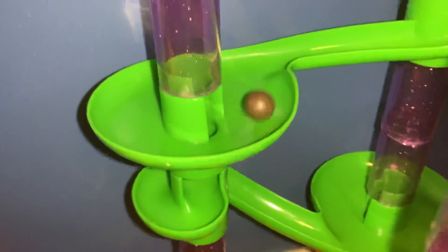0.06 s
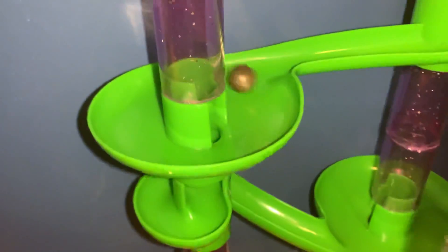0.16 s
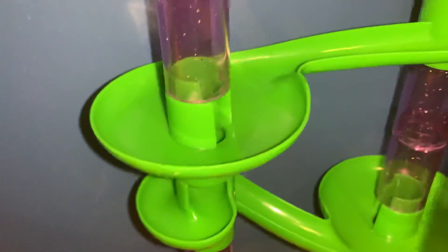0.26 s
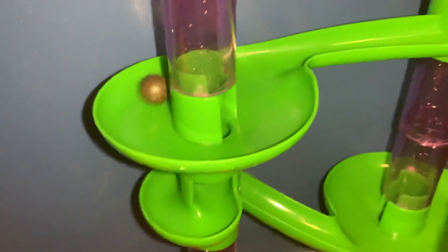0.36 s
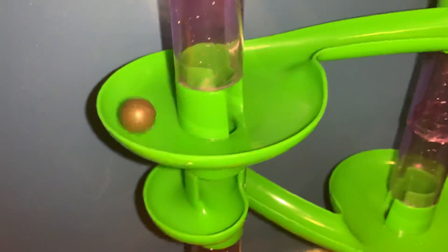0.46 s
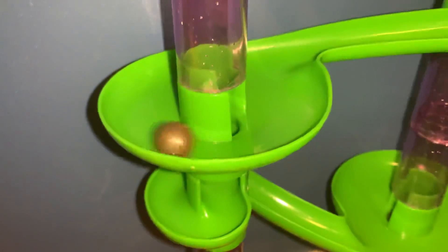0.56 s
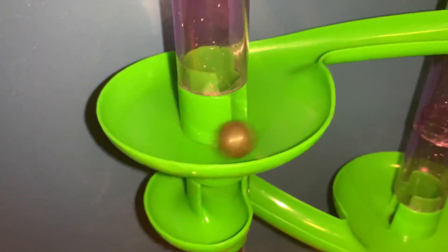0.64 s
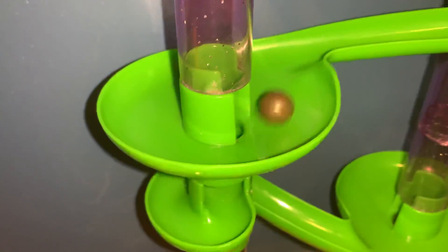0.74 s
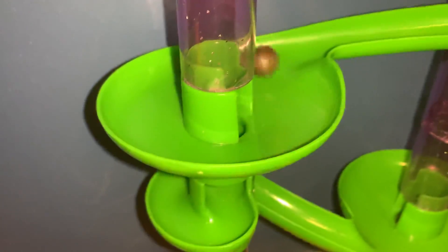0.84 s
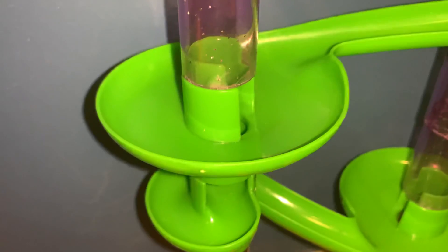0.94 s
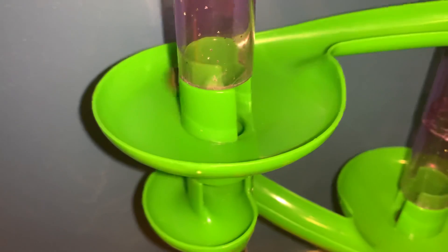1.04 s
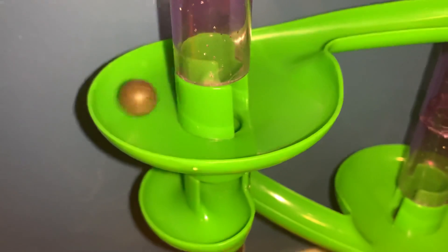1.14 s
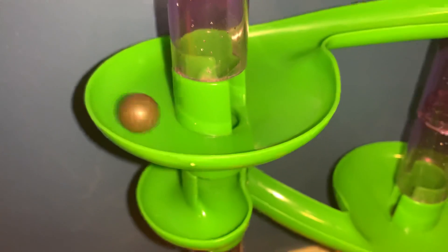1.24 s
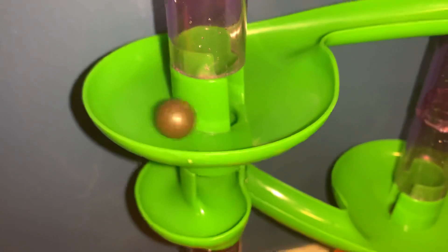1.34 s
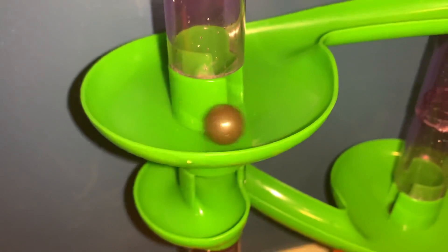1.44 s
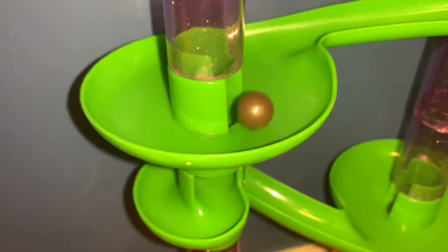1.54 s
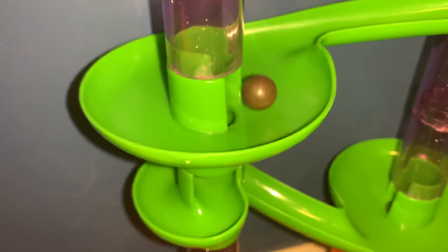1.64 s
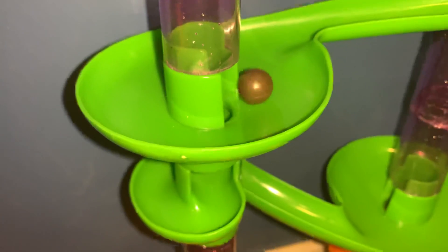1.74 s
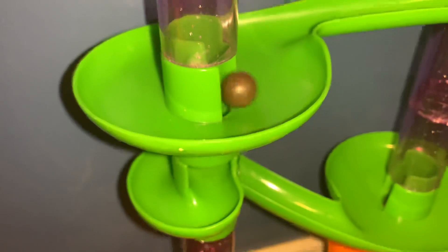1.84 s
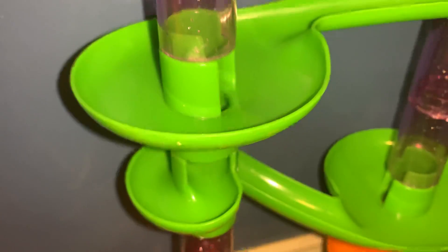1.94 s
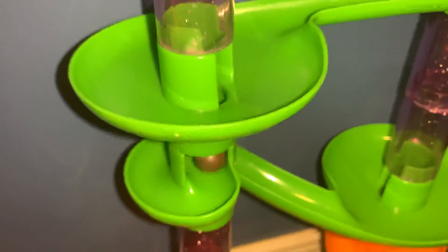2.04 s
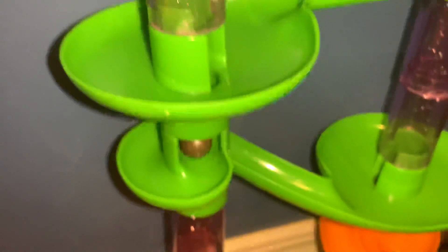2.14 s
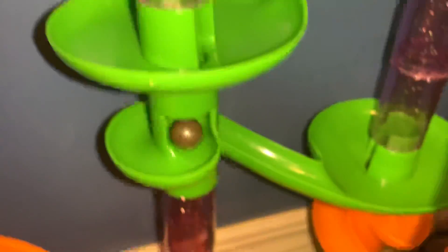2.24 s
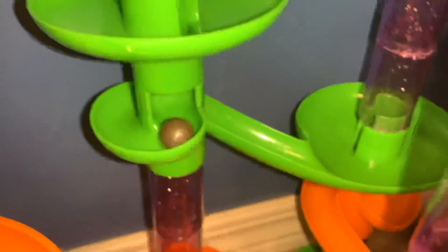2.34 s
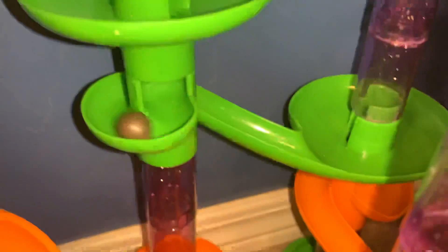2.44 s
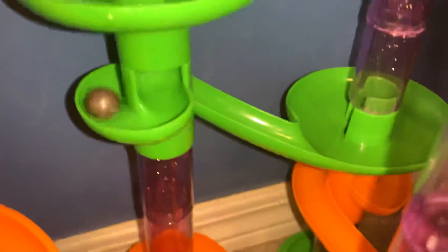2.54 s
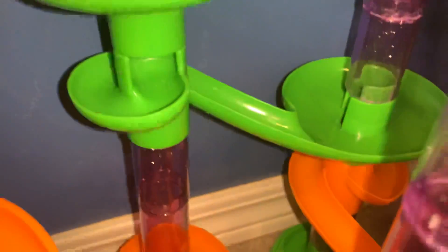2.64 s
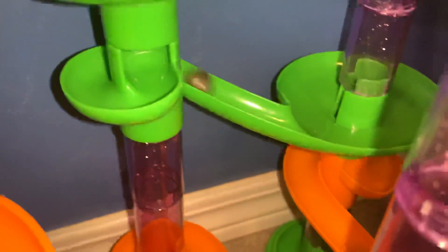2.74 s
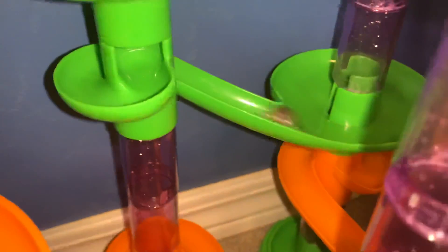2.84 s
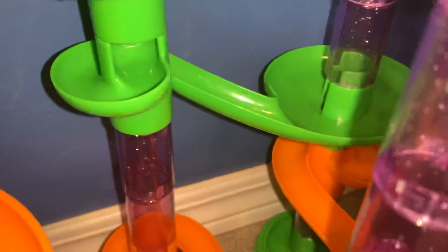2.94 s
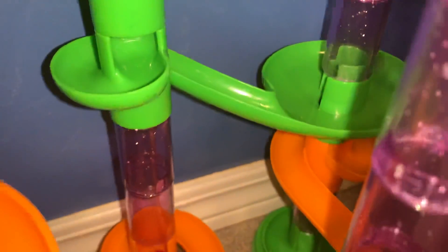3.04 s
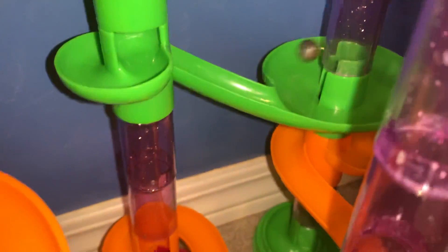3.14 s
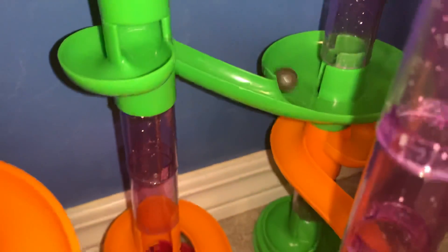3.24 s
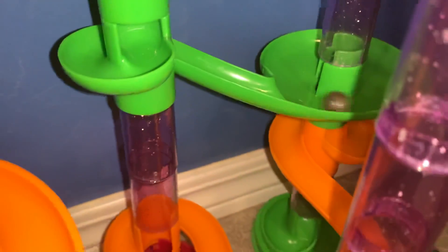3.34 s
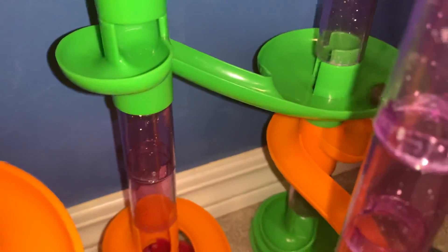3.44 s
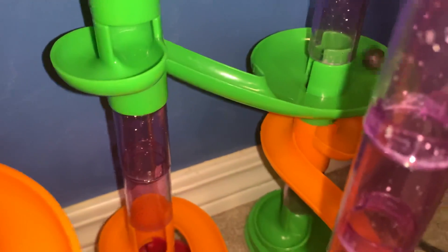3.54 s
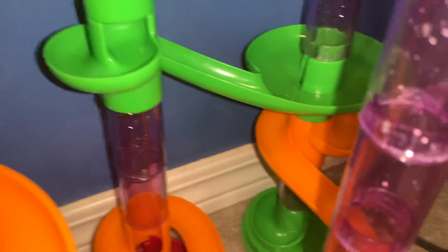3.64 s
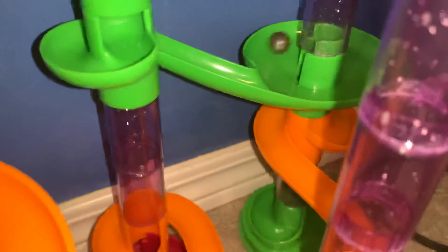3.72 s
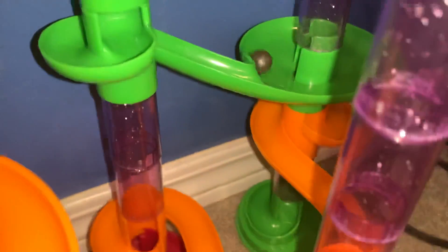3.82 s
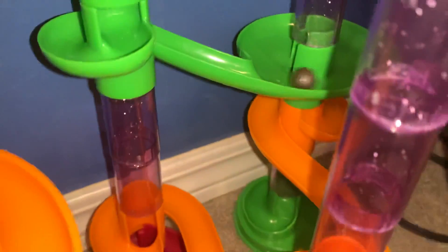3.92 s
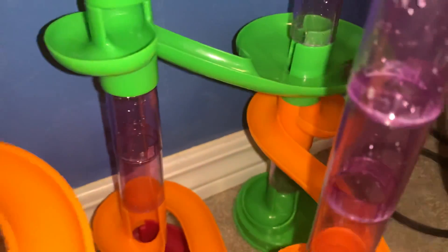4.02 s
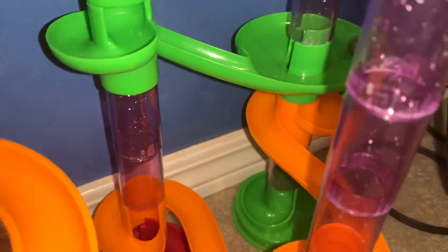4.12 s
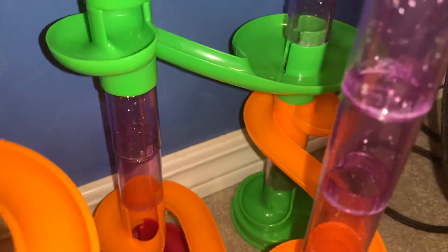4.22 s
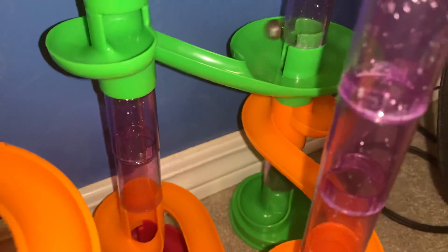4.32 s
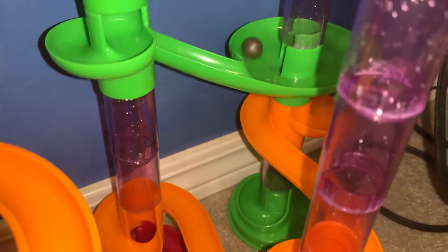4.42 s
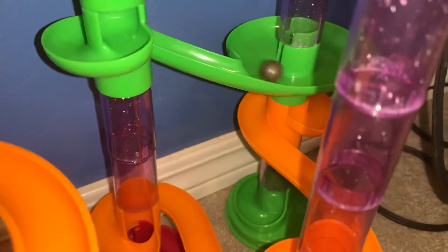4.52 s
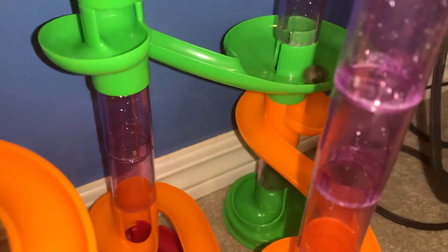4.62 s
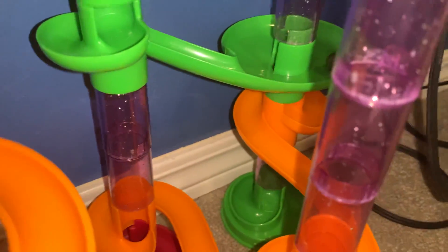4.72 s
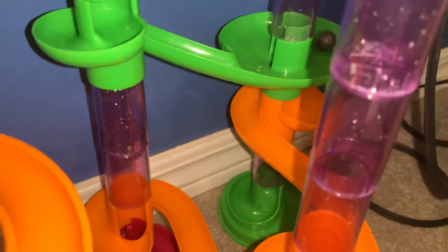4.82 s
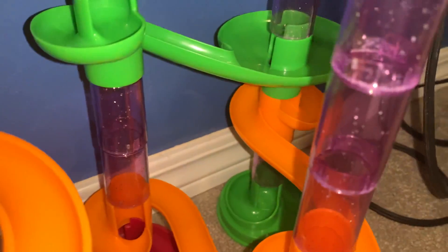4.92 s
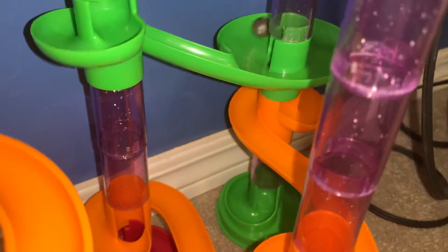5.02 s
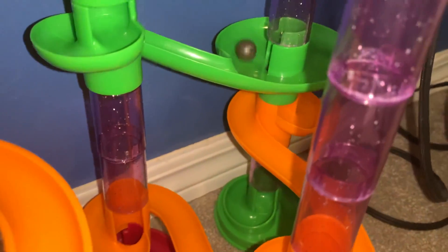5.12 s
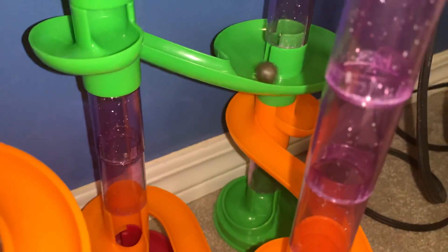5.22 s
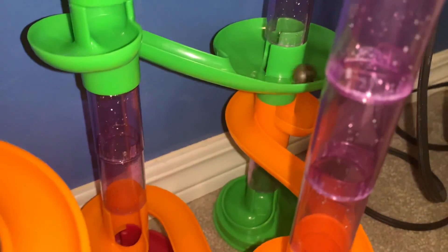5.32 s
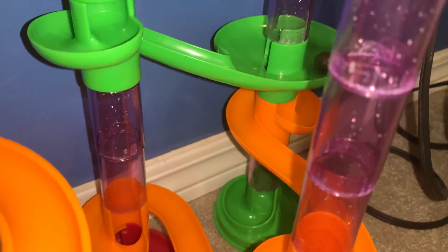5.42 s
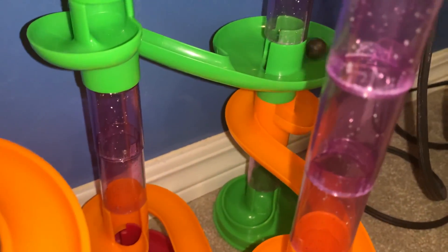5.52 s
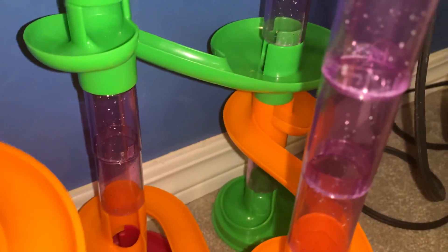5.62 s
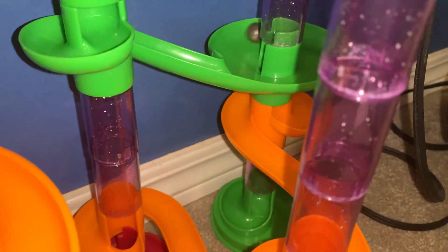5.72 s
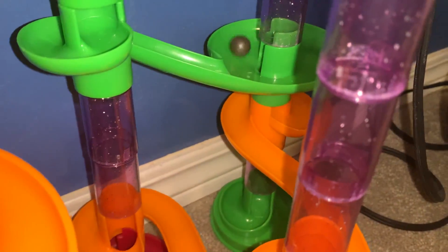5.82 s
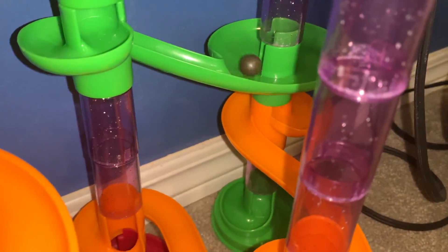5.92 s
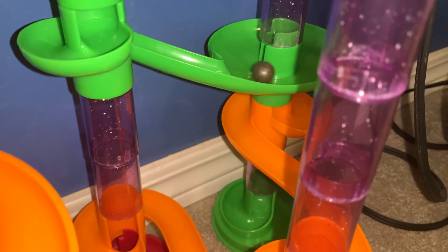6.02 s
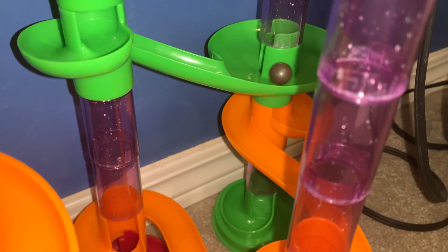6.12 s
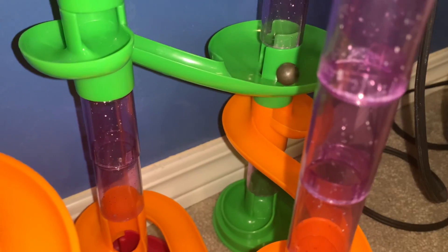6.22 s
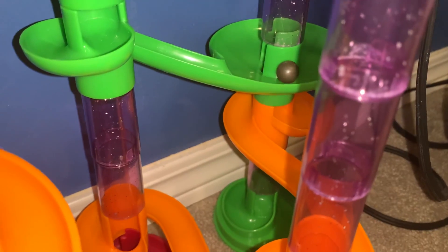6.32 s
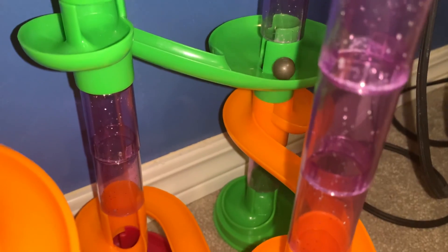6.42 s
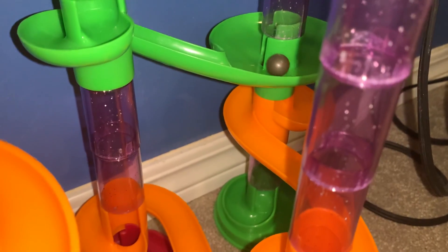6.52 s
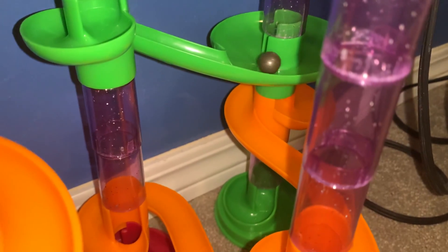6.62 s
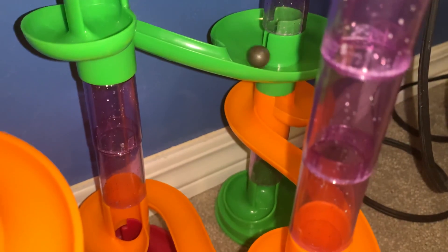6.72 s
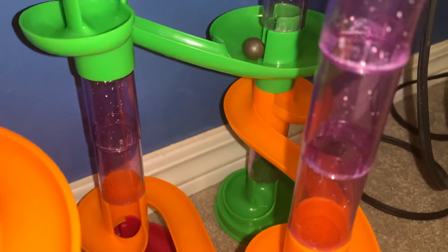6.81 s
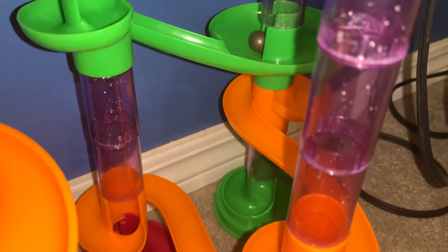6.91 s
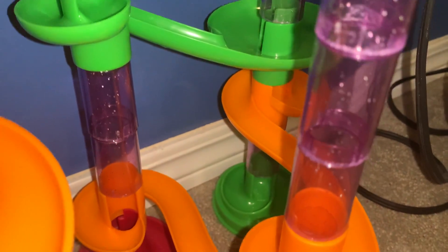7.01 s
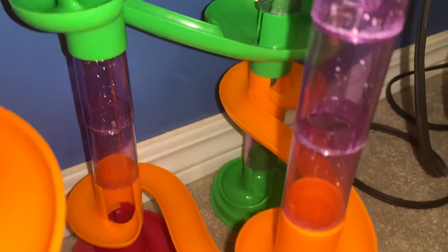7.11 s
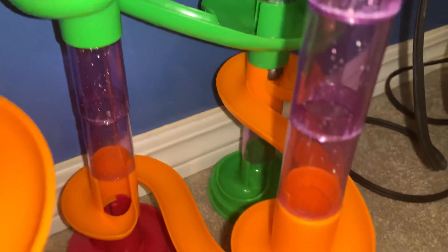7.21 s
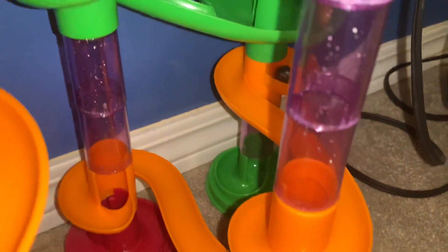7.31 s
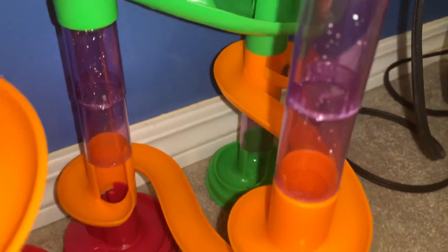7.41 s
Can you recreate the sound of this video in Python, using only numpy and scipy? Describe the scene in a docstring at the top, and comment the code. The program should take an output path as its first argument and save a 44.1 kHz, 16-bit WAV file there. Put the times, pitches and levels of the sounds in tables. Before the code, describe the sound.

A steel marble rolls around plastic dishes with a grainy rattling whir, clattering loudly as it drops through the toy run's tubes in a quiet room.

```python
"""In a quiet room a steel marble circles two plastic dishes of a toy run and drops through its tubes.
Rolling over the rough moulding is random forcing: it shakes the resonant dish modes and makes a hiss.
Knocks are impacts: a few ms of chatter ring the tower's modes, and a short rattle of filtered noise dies away.
Air noise and a wavering hum lie beneath. A phone close by hears the bass much alike on both sides, the middle
wide, and one treble that reaches the left slightly late."""
import sys
import numpy as np
from scipy import signal
from scipy.fft import rfft, irfft, next_fast_len
from scipy.io import wavfile
from scipy.ndimage import uniform_filter1d

SR = 44100
rng = np.random.default_rng(int(sys.argv[2]) if len(sys.argv) > 2 else 0)


def how_loud(loudness_db):
    """Turn decibels into a plain amplitude multiplier (0 dB gives 1, 20 dB gives 10)."""
    steps = np.asarray(loudness_db, float) / 20
    return 10 ** steps


def put_to_file(sound):
    """Save the sound as 16-bit audio at rate SR, in the file named by the first command-line argument."""
    columns = np.atleast_2d(sound).T  # one column per channel
    safe = np.clip(columns, -1, 1)
    whole_steps = np.round(safe * 32767)
    wavfile.write(sys.argv[1], SR, whole_steps.astype(np.int16))


N = 328986
T = np.arange(N) / SR
BANDS_HZ = 57 * 2 ** np.arange(0, 8.2, 1 / 3)  # third-octave centres


def along(hz, table, axis=1):
    """Interpolation on a logarithmic frequency axis: reads one column of a table at hz."""
    table = np.array(table)
    return np.interp(np.log(hz), np.log(table[:, 0]), table[:, axis])


def unit(x):
    """Normalization: scales a signal to rms 1."""
    return x / np.sqrt(np.mean(x ** 2))


def ring(x, hz, t60):
    """Damped resonator: an impulse starts a decaying swing of size 1 that radiates no deep bass."""
    radius = np.exp(-np.log(1000) / (t60 * SR))
    angle = 2 * np.pi * hz / SR
    return signal.lfilter([.5, 0, -.5], [1, -2 * radius * np.cos(angle), radius ** 2], x)


def third(x, hz):
    """Band-pass filtering: keeps the third of an octave around hz."""
    edges = [hz / 2 ** (1 / 6), hz * 2 ** (1 / 6)]
    return signal.sosfilt(signal.butter(2, edges, "band", fs=SR, output="sos"), x)


def walk(rate):
    """Slow random modulation: levels held 1 / rate s and smoothed twice, with a spread near 1."""
    hold = int(SR / rate)
    levels = np.repeat(rng.standard_normal(N // hold + 1), hold)
    return 1.647 * uniform_filter1d(uniform_filter1d(levels, hold), hold)[:N]


def waver(x, share=0.01173, rate=5.):
    """Frequency modulation by variable delay: reading at a wandering place makes the pitch drift."""
    place = np.arange(N) + share * SR / rate * uniform_filter1d(walk(rate), size=2000)
    return np.array([np.interp(place, np.arange(N), side) for side in x])


# Spectrum of the air noise. Each row: frequency in Hz, relative density in dB per Hz.
AIR_SPECTRUM = [(18, -29), (30, -13), (54, -11.5), (80, -14.5), (126, -4), (147, -14.5), (322, -28),
                (5300, -49.5), (11600, -49.5), (12500, -47), (16200, -77), (22000, -120)]
AIR_DB = -66  # rms
HUM_HZ, HUM_DB = 120, -81.5  # mean rms level


def room_air():
    """Stationary background noise: spectrally shaped noise under a mains hum of wavering level."""
    f = np.maximum(np.arange(N // 2 + 1) * SR / N, 1)
    spectrum = rfft(rng.standard_normal((2, N))) * how_loud(along(f, AIR_SPECTRUM))
    air = unit(irfft(spectrum, N)) * how_loud(AIR_DB)
    hum = np.sqrt(2) * how_loud(HUM_DB + 2.0 * walk(6.3)) * np.sin(2 * np.pi * HUM_HZ * T)
    return air + hum


def contact_force(rough_db=1.0, bump_rate=1200., spread_db=1.6):
    """Roughness excitation: fine grain over dense rounded bumps, at the same moments for both sides."""
    hit = rng.random(N) < bump_rate / SR
    size = uniform_filter1d(hit * how_loud(spread_db * rng.exponential(size=N)), size=130) * 130
    envelope = unit(how_loud(rough_db * walk(30)) * (3 + size))
    return envelope * rng.standard_normal((2, N))


SURGE_DB, SURGE_RISE_S, SURGE_FALL_S = 2.5, 0.025, 0.031


def surge():
    """Load modulation: every light bump presses the marble into the dish, so the roll surges around it."""
    shapes = []
    for row in BUMPS:
        before = (row[0] - T) / SURGE_RISE_S
        after = ((T - row[0]) / SURGE_FALL_S) ** 2 * (T > row[0])
        shapes.append(np.exp(-np.maximum(before, after)))
    return SURGE_DB * (np.max(shapes, axis=0) - .3)


# Strength of the rolling.
# Each row: time in seconds, drive level of the roll in dB, of the rim ring in dB, of the treble in dB.
ROLL_LEVELS = [(0.0, -52.5, -44.5, -52.5), (0.2, -54, -53.5, -54), (0.33, -53, -46.5, -56.5),
               (0.46, -52.5, -53, -55.5), (0.51, -56.5, -48, -61), (0.56, -61, -52.5, -67),
               (0.62, -52.5, -40.5, -55.5), (0.69, -55.5, -40, -57), (0.77, -49.5, -48.5, -51),
               (0.89, -53.5, -53, -61.5), (0.98, -61, -54, -62), (1.06, -49.5, -54, -50.5),
               (1.16, -57, -95, -69), (1.3, -63.5, -101, -83.5), (1.391, -58.5, -72, -56.5),
               (1.54, -58.5, -70, -69.5), (1.635, -47.5, -29.5, -52), (1.799, -72.5, -74, -96),
               (1.95, -62, -84, -83), (2.1, -53, -47, -74), (2.26, -47.5, -71, -54),
               (2.33, -61.5, -65, -72), (2.429, -59, -65, -74.5), (2.56, -55, -49.5, -63),
               (2.66, -53.5, -47, -53), (2.95, -50.5, -38.5, -42.5), (3.05, -54, -45, -41),
               (3.14, -54, -46, -52.5), (3.3, -50, -47.5, -51), (3.42, -59, -47, -60.5),
               (3.5, -55, -47, -54.5), (3.57, -54, -48, -56), (3.78, -52.5, -45, -55.5),
               (3.98, -53.5, -48.5, -50.5), (4.06, -60, -49, -65.5), (4.12, -54, -47, -57.5),
               (4.3, -56.5, -46.5, -59), (4.45, -51.5, -48.5, -54.5), (4.67, -55.5, -52.5, -63),
               (4.9, -55, -49, -59), (5.0, -59, -51, -66), (5.1, -56.5, -56, -63), (5.2, -53.5, -55.5, -56),
               (5.33, -58, -56, -61.5), (5.42, -63.5, -61, -77), (5.52, -56, -60, -62),
               (5.63, -56.5, -53, -59.5), (5.75, -63, -53.5, -69.5), (5.9, -48.5, -52, -54),
               (5.981, -71.5, -66, -76.5), (6.092, -58, -77, -78), (6.2, -68, -84, -81),
               (6.281, -95, -97.5, -91), (6.67, -102.5, -104, -101), (6.8, -81, -95, -92),
               (6.868, -61, -94.5, -87), (6.96, -60.5, -83, -85.5), (7.04, -79, -74, -81),
               (7.19, -51, -42, -46.5), (7.25, -68, -55, -64), (7.29, -56.5, -53, -74),
               (7.35, -57.5, -51, -65), (7.46, -62, -63, -70)]
# Where the rim ring sits as the marble moves over the dish. Each row: time in seconds, frequency in Hz.
RIM_RING_PATH = [(0, 1570), (0.3, 1760), (0.44, 1460), (0.515, 1980), (0.6, 1470), (0.665, 800),
                 (0.74, 1340), (0.85, 1650), (2.4, 1620), (2.72, 1560), (2.86, 1820), (3.05, 1950),
                 (3.25, 1810), (3.55, 1670), (3.8, 1800), (4.0, 1400), (4.08, 1900), (4.35, 1740),
                 (4.52, 1400), (4.88, 1400), (4.98, 1760), (5.2, 1450), (5.45, 1300), (5.7, 1480),
                 (5.9, 1500), (7.0, 1500), (7.46, 1520)]
# Laps round a dish, through which the rumble climbs.
# Each row: start in seconds, length in seconds, frequency in Hz at which the rumble starts.
DISH_LAPS = [(0.456, 0.22, 270), (2.946, 0.5, 206), (3.541, 0.38, 210), (4.045, 0.64, 196),
             (4.612, 0.79, 186), (5.396, 0.69, 248)]
LAP_TO_HZ, UPPER_RUMBLE_HZ = 430, 394  # end of a lap's climb; rumble outside the laps
LAP_BEND = 1.41  # above 1 the climb starts slowly
LAP_DIP_DB, LAP_DIP_SHARE = -5.5, 0.65  # the rumble thins at the start of a lap; share of the lap it fades over
RUMBLE_DB = 3.5  # against the roll
RIM_WANDER_OCT, RIM_LIFT_DB = 0.042, 0.5
FLUTTER_DB, FLUTTER_PER_S = 1.2, 51  # the treble flutters as a whole


def rolling():
    """Time-varying excitation: roll levels, rumble pitch lap by lap, rim pitch wandering along its path."""
    s, *levels = np.transpose(ROLL_LEVELS)
    surge_db = surge()
    level_db, rim_db, treble_db = (np.interp(T, s, db) + surge_db for db in levels)
    rumble_hz = np.full(N, float(UPPER_RUMBLE_HZ))
    rim_hz = np.interp(T, *np.transpose(RIM_RING_PATH))
    early = np.zeros(N)
    for start_s, length_s, from_hz in DISH_LAPS:
        on = (T >= start_s) & (T < start_s + length_s)
        lap = (T[on] - start_s) / length_s
        rumble_hz[on] = from_hz * (LAP_TO_HZ / from_hz) ** lap ** LAP_BEND
        early[on] = np.exp(-lap / LAP_DIP_SHARE)
    rumble_hz, rim_hz, early = uniform_filter1d(np.array([rumble_hz, rim_hz, early]), size=2000)
    rumble_db = level_db + RUMBLE_DB + LAP_DIP_DB * early
    rim_db = rim_db + RIM_LIFT_DB * early
    rim_hz = rim_hz * 2 ** (RIM_WANDER_OCT * walk(12))
    return level_db, rumble_db, rumble_hz, rim_db, rim_hz, treble_db + FLUTTER_DB * walk(FLUTTER_PER_S)


RIM_BELOW, RIM_ABOVE, RIM_REACH_DB = 32, 60, 19.5  # fall-off in dB per octave squared, and its limit
CROSSING_DB, CROSSING_OCT = 5, 0.2  # lift of the lower modes that the rim ring crosses


def roll_db(hz, roll):
    """Spectral division of the drive: rumble, dish, rim and grit take over in turn with frequency."""
    dish_db, rumble_db, rumble_hz, rim_db, rim_hz, grit_db = roll
    off = np.log2(hz / rim_hz)
    crossing_db = CROSSING_DB * np.exp(-(off / CROSSING_OCT) ** 2)
    if hz < 780:
        return rumble_db - np.minimum(14 * np.log2(hz / rumble_hz) ** 2, 12) + crossing_db
    if hz < 1250:
        return dish_db + crossing_db
    if hz < 3000:
        return rim_db - np.minimum(np.where(off > 0, RIM_ABOVE, RIM_BELOW) * off ** 2, RIM_REACH_DB)
    return grit_db


# Modes of the two dishes. Each row: frequency in Hz, bandwidth in Hz, relative level in dB.
UPPER_DISH_MODES = [(322.4, 24, -15.5), (418.4, 45, 5), (614, 27, 2.5), (733, 55, 7), (932, 18, 5),
                    (1016, 150, 9.5), (1110.6, 9.3, 5.5), (1310, 40, -15.5), (1510, 51, -5), (1740, 29, -9),
                    (2170, 110, -6.5), (2400, 73, -3.5), (3240, 140, -27), (4088, 210, -10),
                    (4530, 200, -12.5), (6370, 220, -27.5), (8800, 500, -29), (9640, 670, -17),
                    (12820, 700, -24)]
LOWER_DISH_MODES = [(191.3, 20, 6.5), (323.3, 24, 3), (472, 43, 8), (609.3, 16.4, 7), (705, 29.4, 12),
                    (951, 46, 11.5), (1078, 61, 7.5), (1322.6, 13.7, -3.5), (1400, 140, -5),
                    (1569, 22, -6.5), (1626, 14, -7), (1918, 28, -3), (2170, 62, -2.5), (2935, 45, -4.5),
                    (4055, 76, -14), (4400, 400, -8.5), (6020, 110, -19.5), (7140, 320, -18),
                    (8660, 190, -13.5), (10250, 530, -14.5), (11800, 1500, -11)]
CHANGE_S = 2.803  # the marble reaches the lower dish
ROLL_TOP_HZ = 14500  # the ringing of the dishes is dark above here


def dishes(force, roll):
    """Modal synthesis: modes swell and fade as the marble crosses nodes; its weight bends the lower ones."""
    out = 0
    lower = np.clip((T - CHANGE_S) / 0.17, 0, 1)
    for modes, share in ((UPPER_DISH_MODES, 1 - lower), (LOWER_DISH_MODES, lower)):
        for hz, width_hz, db in modes:
            t60 = np.log(1000) / (np.pi * width_hz)
            mode = unit(ring(ring(force, hz, t60), hz, t60 / 3))
            if hz < 3000:
                mode = waver(mode)
            lift_db = 0 if hz < 1250 else 4 if hz < 2700 else 10
            flicker_db = 1.7 * walk(11) + 2.5 * min(hz / 6000, 1) * walk(40)
            out = out + mode * share * how_loud(db + lift_db + roll_db(hz, roll) + flicker_db)
    low_pass = signal.butter(6, ROLL_TOP_HZ, fs=SR, output="sos")
    return how_loud(-3.0) * signal.sosfilt(low_pass, out)


# Hiss of rolling. Each row: frequency in Hz, relative level in dB.
GRIT_SPECTRUM = [(57, -33), (120, -15), (300, 1.5), (1000, -0.5), (2000, 2), (3500, -0.5), (6000, -3.5),
                 (8500, -16.5), (11500, -15), (14500, -26)]


def hiss(force, roll):
    """High modal density: the countless small modes under rolling merge into bands of noise."""
    out = 0
    surge_db = 3.5 * walk(22)  # the top surges and lulls as one
    for hz in BANDS_HZ:
        # the treble flickers in patches
        flicker_db = 1.1 * walk(14) + 2.0 * min(hz / 8000, 1) * walk(45)
        top_db = surge_db * np.clip(hz / 3000 - 1, 0, 1)
        level = how_loud(roll_db(hz, roll) + along(hz, GRIT_SPECTRUM) + flicker_db + top_db)
        out = out + unit(third(force, hz)) * level
    return out


# Clacks against post, rims and tubes. Each row: time in seconds, nominal peak in dB,
# strongest ring in Hz, nominal thud in dB, nominal tick in dB.
CLACKS = [(1.042, -18, 3230, -32, -29), (1.1088, -29.5, 1073, -33, -35), (1.343, -14.5, 3230, -27.5, -28),
          (1.6099, -13.5, 3140, -22, -28.5), (1.679, -27, 3020, -26.5, -44), (1.903, -25.5, 387, -41, -58),
          (1.9589, -13.5, 4120, -16.5, -19.5), (1.9782, -3, 2703, -11.5, -7.5),
          (2.012, -2, 2143, -10, -12.5), (2.0285, -15, 1510, -54, -19), (2.04, -16.5, 4400, -39, -25.5),
          (2.052, -26, 1740, -37, -42), (2.064, -19, 1507, -18.5, -29), (2.0723, -9.5, 1618, -48, -25),
          (2.0953, -18.5, 1740, -30, -24), (2.112, -28.5, 1740, -40, -49.5),
          (2.141, -14.5, 2570, -19.5, -23), (2.1828, -18.5, 4400, -25, -31.5),
          (2.2134, -21, 4170, -48, -31.5), (2.2361, -19, 4400, -28.5, -28), (2.252, -22.5, 2140, -34, -36),
          (2.272, -26.5, 2400, -35, -40.5), (2.7457, -24, 1455, -29, -35), (2.9617, -29, 974, -68, -33.5),
          (2.9952, -25, 4700, -49.5, -27.5), (5.9229, -14.5, 2610, -23.5, -31.5),
          (6.0863, -20.5, 3230, -30, -33.5), (6.8886, -16, 3210, -23, -25.5), (6.971, -34, 970, -45, -69),
          (7.056, -5.5, 1140, -10, -10.5), (7.058, -17, 5400, -36, -21.5), (7.066, -8.5, 1390, -30, -35.5),
          (7.0883, -20.5, 1400, -23, -19), (7.11, -24, 5400, -34, -31), (7.127, -24, 1400, -19.5, -27),
          (7.1527, -27.5, 1400, -25, -32.5), (7.1801, -31, 1490, -35, -34), (7.231, -24, 2650, -30, -27),
          (7.326, -29.5, 1080, -34, -68), (7.351, -26.5, 1075, -36, -64),
          (7.3649, -31.5, 3520, -33.5, -38.5), (7.4086, -25.5, 4400, -28, -41.5)]
# Light bumps while rolling.
# Each row: time in seconds, nominal peak in dB, strongest ring in Hz, nominal tick in dB.
BUMPS = [(0.0257, -54, 1070, -43), (0.123, -27, 1170, -38), (0.17, -30.5, 1085, -35),
         (0.235, -47, 1060, -52), (0.4173, -41, 935, -38.5), (0.8082, -29, 1070, -32.5),
         (0.822, -27.5, 1050, -34.5), (0.91, -50, 1070, -57), (0.985, -46, 1080, -50),
         (1.435, -46, 1070, -51), (2.378, -29, 934, -77), (2.428, -28, 377.5, -61), (2.4883, -26, 370, -73),
         (2.723, -25, 1130, -34.5), (2.866, -30.5, 1890, -55), (3.047, -29, 2250, -39),
         (3.113, -43, 1070, -41), (3.25, -27.5, 1900, -36.5), (3.304, -28, 4400, -53),
         (3.347, -30, 977, -39), (3.459, -26, 1944, -39), (4.081, -30.5, 2240, -47),
         (4.1355, -33.5, 1900, -59), (4.26, -43, 1070, -42), (4.3333, -29, 2170, -41),
         (4.442, -46, 490, -40.5), (4.5054, -31, 1090, -35.5), (4.59, -29, 960, -50),
         (4.6191, -29.5, 960, -40), (4.749, -46, 1060, -50), (4.786, -47, 1070, -46),
         (4.811, -36, 1054, -39.5), (4.8806, -36, 1310, -38), (4.954, -31.5, 1900, -43),
         (5.0474, -34, 1740, -42.5), (5.1418, -41, 487, -40), (5.16, -28.5, 481, -37),
         (5.233, -41, 950, -40), (5.268, -31, 944, -54), (5.637, -42, 980, -41), (5.678, -54, 1400, -46),
         (5.765, -45, 1900, -48.5)]
BUMP_THUD_DB, BUMP_TAIL_DB = -8, 2  # thud and rattle against the peak
# tail against the peak of a middling clack, where that lies, loss per dB of blow, and limit
TAIL_DB, TAIL_AT_DB, TAIL_LOSS, TAIL_TOP_DB = 3.5, -12.5, 0.43, 6
# weak knocks whose tick lies well under the peak land softly and swell slowly
SOFT_DB, SOFT_SPAN_DB, DULL_GAP_DB, DULL_SPAN_DB = -21.5, 15, 2, 8.5
DULL_DB_PER_OCT = 1.5  # a knock's body weakens above its own ring


def blows():
    """Compressive response: the rattle grows more slowly than the blow. Time, peak, ring, thud, tick, tail."""
    s, peak_db, own_hz, thud_db, tick_db = np.transpose(CLACKS)
    tail_db = np.minimum(TAIL_DB - TAIL_LOSS * (peak_db - TAIL_AT_DB), TAIL_TOP_DB)
    tail_db = np.where(peak_db < SOFT_DB - 3.5, BUMP_TAIL_DB, tail_db)
    at, bump_db, bump_hz, top_db = np.transpose(BUMPS)
    light = [at, bump_db, bump_hz, bump_db + BUMP_THUD_DB, top_db, 0 * at + BUMP_TAIL_DB]
    return np.hstack([[s, peak_db, own_hz, thud_db, tick_db, tail_db], light])


def softness():
    """Contact hardness: 0 for a hard clack, 1 for a light, dull bump."""
    _, peak_db, _, _, tick_db, _ = blows()
    weak = np.clip((SOFT_DB - peak_db) / SOFT_SPAN_DB, 0, 1)
    dull = np.clip((peak_db - tick_db - DULL_GAP_DB) / DULL_SPAN_DB, 0, 1)
    return weak * dull


def knock_db(hz):
    """Impact spectrum: every knock's level at hz, from thud over body to tick, and nearness to its ring."""
    _, peak_db, own_hz, thud_db, tick_db, _ = blows()
    up = np.clip(np.log2(hz / 500) / 0.87, 0, 1)
    top = np.clip(np.log2(hz / 4000), 0, 1)
    body_db = peak_db - 10.0 - DULL_DB_PER_OCT * np.log2(hz / own_hz).clip(0)
    db = (1 - up) * (thud_db - 5.5) + up * ((1 - top) * body_db + top * (tick_db + 1.5))
    return db, np.exp(-(np.log2(hz / own_hz) / .09) ** 2)


KNOCK_SHARE, KNOCK_LAG = 0.55, 5  # share of a knock common to both channels; samples the second has it later


def share_knock(first, second):
    """Partial coherence: the second channel holds a delayed share of the first."""
    return KNOCK_SHARE * np.roll(first, KNOCK_LAG, axis=-1) + np.sqrt(1 - KNOCK_SHARE ** 2) * second


def push(chatter, at, gain):
    """Superposition: lays the chatter of all knocks on the time line at given strengths."""
    x = np.zeros((2, N + chatter.shape[-1]))
    for side in range(2):
        np.add.at(x[side], at, chatter[:, side] * gain[:, side, None])
    return x[:, :N]


# Modes of the tower that a knock rings.
# Each row: frequency in Hz, relative level in dB, time in seconds to decay by 60 dB.
TOWER_MODES = [(300, -9, .1), (390, -2, .09), (485, -4, .09), (750, -8, .06), (945, -8, .05),
               (1075, -6, .05), (1390, -4, .05), (1530, -6, .05), (1680, -5, .05), (1740, -4, .07),
               (1900, -7, .05), (2240, -5, .05), (2410, -8, .04), (2570, -5, .05), (2790, -8, .04),
               (3050, -11, .035), (3320, -5, .045), (3530, -8, .04), (4040, -7, .04), (4400, -7, .03),
               (4700, -7, .03), (5400, -6, .03), (7100, -10, .025)]
CHATTER_S, CHATTER_RISE_S, BUZZ_DB = .0042, .0016, 1.2  # decay and rise of a hard clack


def knocks(crack_db=7.0, ring_db=-2.5, own_db=9.5, scatter_db=2.5, soft_db=-3.5):
    """Impact excitation: a few ms of chatter give a broad crack and ring the tower in a new mix each time."""
    k = np.arange(900)
    at = (blows()[0] * SR).astype(int)[:, None] + k
    soft = softness()
    soft_rows = soft[:, None, None]
    rise = np.minimum(k / (CHATTER_RISE_S * SR + 300.0 * soft_rows), 1)
    decay = np.exp(-k / (CHATTER_S * SR * (1 + 0.72 * soft_rows)))
    chatter = rng.standard_normal((len(at), 2, len(k))) * decay * rise
    chatter[:, 1] = share_knock(chatter[:, 0], chatter[:, 1])
    mix = rng.standard_normal((len(at), len(TOWER_MODES)))
    out = 0
    for m, (hz, db, t60) in enumerate(TOWER_MODES):
        base_db, own = knock_db(hz)
        # the blow sets how far the mode swings, whatever the chatter's fine shape
        pickup = np.abs(chatter @ np.exp(2j * np.pi * hz * k / SR)) + 2
        swing_db = base_db + db + ring_db + own_db * own * (2 - 0.6 * soft)
        swing_db = swing_db + soft_db * soft + scatter_db * mix[:, m]
        rung = ring(push(chatter, at, how_loud(swing_db)[:, None] / pickup), hz, t60)
        mode = signal.sosfilt(signal.butter(2, 2 * hz, fs=SR, output="sos"), rung)
        out = out + mode * how_loud(BUZZ_DB * walk(120))  # loose joints make it buzz
    for hz in BANDS_HZ[3::3]:
        edges = [hz / np.sqrt(2), min(hz * np.sqrt(2), 17000)]
        octave = signal.butter(3, edges, "band", fs=SR, output="sos")
        crack = how_loud(knock_db(hz)[0] + crack_db + soft_db * soft)[:, None] * np.ones(2)
        out = out + signal.sosfilt(octave, push(chatter, at, crack)) * (4000 / hz) ** 0.14
    return out


def swell(power, size):
    """Moving average: spreads a blow's power over a short rise of size samples."""
    return uniform_filter1d(power, size, origin=size // 2)


# Rattle after a knock.
# Each row: frequency in Hz, relative level in dB, time in seconds to decay by 60 dB.
RATTLE_DECAY = [(57.24, -15.5, 0.28), (120, -11, 0.14), (200, -17.5, 0.15), (382, 3, 0.33),
                (620, 5.5, 0.16), (1400, 10, 0.19), (3930, 12, 0.15), (6850, 5, 0.068), (10300, 13, 0.0081),
                (15880, -21, 0.051)]
RATTLE_RING_DB, RATTLE_OWN_DB = -2, 4.1  # tower modes in the rattle; lift near the knock's own ring
RATTLE_SCATTER_DB, RATTLE_FLICKER_DB = 1.2, 1.0
HALO_DB, HALO_S = -21, .0045  # faint halo of noise heard ahead of a hard clack; time constant of its power


def rattle():
    """Exponential energy decay: after each knock, noise coloured by the tower dies away band by band."""
    s, _, _, _, _, tail_db = blows()
    at = (s * SR).astype(int)
    softly = softness()
    shake = rng.standard_normal((2, N))
    shake[1] = share_knock(shake[0], shake[1])
    tower = sum(unit(ring(shake, hz, t60)) * how_loud(db) for hz, db, t60 in TOWER_MODES)
    shake = shake + how_loud(RATTLE_RING_DB) * unit(tower)
    halo_step = np.exp(-1 / (HALO_S * SR))
    out = 0
    for hz in BANDS_HZ:
        hard, soft = np.zeros((2, N))
        base_db, own = knock_db(hz)
        level_db = base_db + RATTLE_OWN_DB * own + tail_db + along(hz, RATTLE_DECAY) - 14.0
        power = how_loud(level_db + RATTLE_SCATTER_DB * rng.standard_normal(len(at))) ** 2
        hard[at] = power * (1 - softly)
        soft[at] = power * softly
        # filtered backwards in time, the halo lies ahead of the clack and is no part of it
        halo = how_loud(HALO_DB) ** 2 * signal.lfilter([1], [1, -halo_step], hard[::-1])[::-1]
        fall = np.exp(-2 * np.log(1000) / (along(hz, RATTLE_DECAY, axis=2) * SR))
        tail = signal.lfilter([1], [1, -fall], swell(hard, size=161) + swell(soft, size=801))
        envelope = np.sqrt(halo + tail.clip(0))
        out = out + unit(third(shake, hz)) * envelope * how_loud(RATTLE_FLICKER_DB * walk(70))
    return out


def scene():
    """Superposition of sources: two partly independent channels, for the two microphones to share."""
    air = room_air()
    force, roll = contact_force(), rolling()
    return air + dishes(force, roll) + hiss(force, roll) + knocks() + rattle()


# Response of the microphones. Each row: frequency in Hz, gain in dB.
MICROPHONE_RESPONSE = [(20, -22), (45, -5), (90, -3.5), (200, -5.5), (15600, 0.5), (16600, -23.5),
                       (17000, -46.5)]
# Likeness of the two sides. Each row: frequency in Hz, share common to both sides.
SIDE_LIKENESS = [(30, 0.72), (250, 0.9), (700, 0.48), (1500, 0.13), (5000, 0.22), (6200, 0.089), (8000, 1),
                 (17000, 0.7)]
# Slow drift of the balance. Each row: time in seconds, left minus right in dB.
BALANCE = [(0, 0.5), (0.7, 1), (1.2, 0.8), (2.0, 0.5), (4, -0.3), (7.46, 0.5)]
BASS_LEAD = 0.25  # radians the left leads at 400 Hz
TREBLE_ALIGNED_HZ, TREBLE_TURN_HZ = 6200, 4800  # sides in phase here; Hz per full turn of phase


def top_cut(x):
    """Nothing passes above the cut-off."""
    return signal.sosfilt(signal.butter(12, 16970, fs=SR, output="sos"), x)


def record(dry):
    """Interaural-like coherence by frequency: treble reaches the right 0.2 ms sooner; peaks are rounded."""
    size = next_fast_len(N + 512)
    f = np.maximum(np.arange(size // 2 + 1) * SR / size, 1)
    left, other = rfft(dry, size) * how_loud(along(f, MICROPHONE_RESPONSE))
    share = np.clip(along(f, SIDE_LIKENESS), 0, 1)
    treble_turn = 2 * np.pi * (f - TREBLE_ALIGNED_HZ) / TREBLE_TURN_HZ
    bass_turn = -BASS_LEAD * np.minimum(f / 400, 1.5)
    turn = np.where(f > TREBLE_ALIGNED_HZ - 400, treble_turn, bass_turn)
    right = share * np.exp(1j * turn) * left + np.sqrt(1 - share ** 2) * other
    pan = how_loud(np.interp(T, *np.transpose(BALANCE)) * np.array([[.5], [-.5]]))
    sides = pan * irfft(np.array([left, right]), size)[:, :N]
    mix = np.tanh(0.59 * sides) / 0.61
    return top_cut(mix)


dry = scene()
out = record(dry)
put_to_file(out)
```